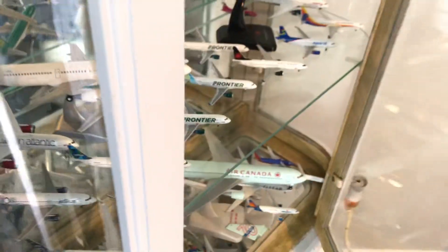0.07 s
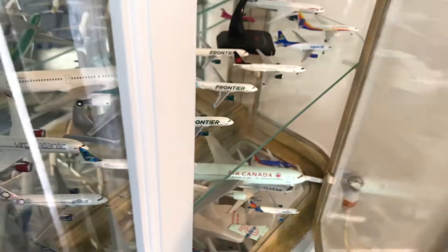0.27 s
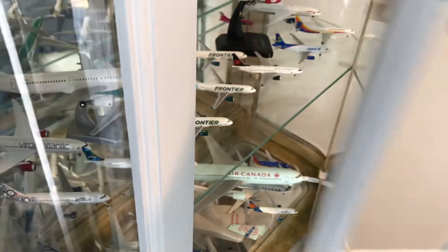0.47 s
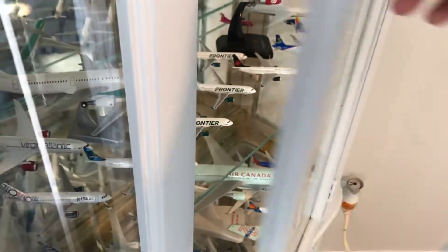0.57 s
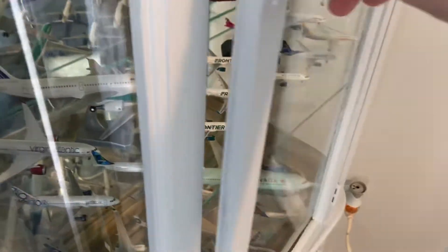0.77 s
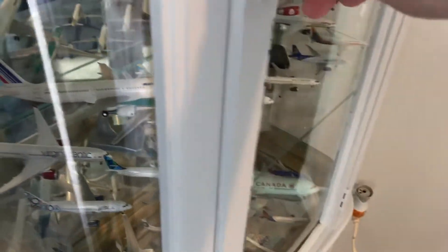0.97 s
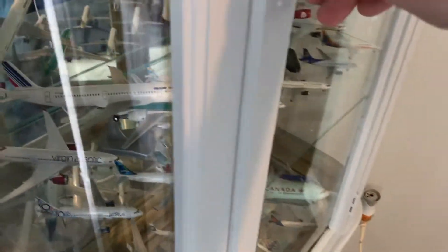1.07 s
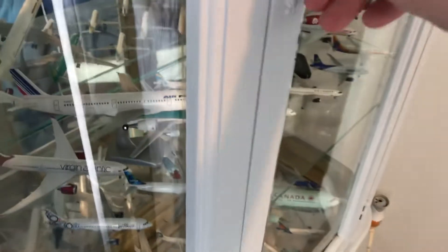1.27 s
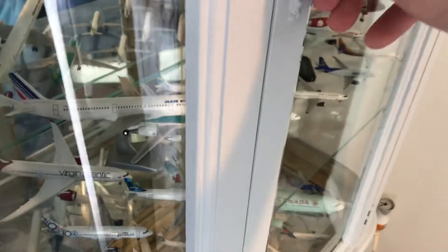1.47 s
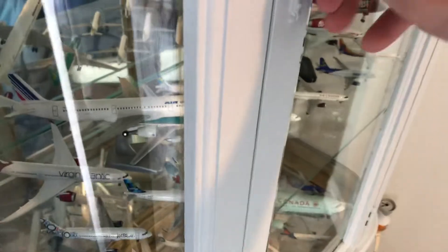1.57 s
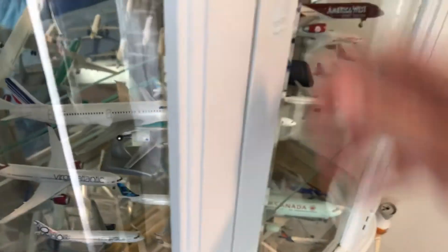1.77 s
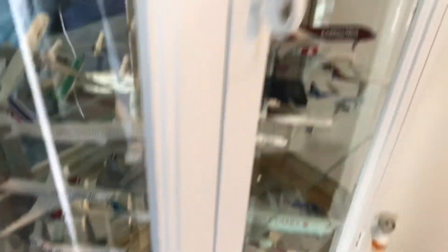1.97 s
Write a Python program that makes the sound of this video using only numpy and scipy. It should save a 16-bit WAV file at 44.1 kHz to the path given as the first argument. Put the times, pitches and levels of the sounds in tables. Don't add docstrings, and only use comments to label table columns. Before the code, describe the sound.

Close phone pickup of a sticking glazed door: quiet handling first, a soft clicking knock, then a bright catch snap and heavy thud with ringing glass, short room echo and faint finger taps afterwards.

```python
import sys
import numpy as np
from scipy import signal
from scipy.fft import rfft, irfft
from scipy.io import wavfile
from scipy.ndimage import uniform_filter1d

SR = 44100
rng = np.random.default_rng(int(sys.argv[2]) if len(sys.argv) > 2 else 0)


def magnitude_from_level(level_db):
    exponent = np.asarray(level_db, float) / 20
    return 10 ** exponent


def unload_wav(signal):
    wavfile.write(
        sys.argv[1],
        SR,
        np.round(np.clip(np.atleast_2d(signal).T, -1, 1) * 32767).astype(np.int16),
    )


N = 88332


def read(table, hz):
    table = np.array(table, float)
    return np.interp(np.log(np.maximum(hz, 1)), np.log(table[:, 0]), table[:, 1])


def unit(x):
    return x / np.sqrt(np.mean(x ** 2))


def coloured(table):
    gain = magnitude_from_level(read(table, np.fft.rfftfreq(N, 1 / SR)))
    return unit(irfft(rfft(rng.standard_normal(N)) * gain, N))


def band(x, hz, width_hz):
    top = .45 * SR
    return signal.lfilter(*signal.iirpeak(min(hz, top), hz / min(width_hz, top), SR), x)


def narrow(x, hz, width_hz):
    return unit(band(band(x, hz, width_hz), hz, width_hz))


def ring(x, modes):
    out = 0
    for hz, db, t60 in modes:
        pole = np.exp(2j * np.pi * hz / SR - np.log(1000) / (t60 * SR))
        out = out + magnitude_from_level(db) * signal.lfilter([1], [1, -pole], x).imag
    return out


def decay(s, ms):
    t = np.arange(N) / SR - s
    return np.clip(t / 0.00038, 0, 1) * np.exp(-np.maximum(t, 0) / (ms / 1000))


def hump(s, length):
    return np.sin(np.pi * np.clip((np.arange(N) / SR - s) / length, 0, 1)) ** 2


def walk(rate):
    k = int(SR / rate)
    return unit(uniform_filter1d(uniform_filter1d(rng.standard_normal(N), k), k))


def pushes(rows):
    return sum(magnitude_from_level(db) * hump(s, ms / 1000) / (ms * SR / 2000) for s, db, ms, *_ in rows)


def cracks(rows, colour):
    return coloured(colour) * sum(magnitude_from_level(db) * decay(s, ms) for s, _, _, db, ms in rows)


# [t/s, thump level/dB, push length/ms, crack level/dB, crack length/ms]
SLAM_HITS = [
    (1.2655, -27, 2, -28, 3.1),
    (1.2777, -30.5, 1.88, -5.5, 3.9),
    (1.281, -19, 0.91, -8.5, 1.8),
    (1.287, -24.5, 2.9, -9.5, 3),
    (1.2906, -19, 4, -13, 1),
    (1.2977, -24.5, 0.92, -13, 1.5),
    (1.3015, -35.5, 2.5, -20, 11),
    (1.33, -35, 2.5, -31, 51.6),
]
KNOCK_HITS = [
    (.9705, -37, 1.8, -37.5, 8.4),
    (.9752, -25.5, 1.93, -50, 1.6),
    (.9785, -44, 0.9, -20, 1.9),
    (.9812, -28, 2.28, -24.5, 7.1),
    (.99, -43, 2.2, -35, 31),
    (1.007, -32, 1.63, -45, 3.3),
]
TAP_HITS = [
    (.002, -46.5, 2.5, -45.5, 4.5),
    (1.767, -51.5, 1.6, -42.5, 4.9),
    (1.969, -55, 1.9, -80.5, 1.7),
    (1.9935, -48, 0.98, -46, 2.8),
]
# [t/s, level/dB, length/ms]
CATCH_SNAPS = [
    (1.2548, -12, 3.8),
    (1.258, -2.5, 0.62),
    (1.259, -4, 0.77),
    (1.262, -5, 3.8),
    (1.2656, -12.5, 5.9),
    (1.2695, -19.5, 3),
    (1.273, -15.5, 3.3),
]
# [f/Hz, level/dB]
SLAM_COLOUR = [(180, -62), (300, -2), (1200, -3), (2140, -3), (3190, -2), (4600, -8), (6740, -9),
               (16000, -30.5)]
KNOCK_COLOUR = [(300, -5.5), (700, -6.5), (3000, -6.5), (6800, -15), (10500, -21.5), (16000, -15.5)]
SNAP_COLOUR = [(180, -41.5), (300, -14), (593, -17), (1120, 0), (3460, 3), (3760, -0.5), (10400, -7.5),
               (15000, -5.5), (16000, -38)]
# [f/Hz, level/dB, time to fall 60 dB/s]
PANE_MODES = [(1053, -11, 0.2), (1190, -13, 0.11), (1950, -10.5, 0.1), (2615, -11, 0.03), (3000, -17, 0.1)]


def door():
    crack = cracks(SLAM_HITS, SLAM_COLOUR) + cracks(KNOCK_HITS + TAP_HITS, KNOCK_COLOUR)
    snap = coloured(SNAP_COLOUR) * sum(magnitude_from_level(db) * decay(s, ms) for s, db, ms in CATCH_SNAPS)
    pane = ring(magnitude_from_level(-20.5) * (crack + snap), PANE_MODES) / 30
    return .5 * (crack + snap) + pane


# [f/Hz, level/dB, time to fall 60 dB/s]
BODY_MODES = [(90, -12.5, 0.32), (107.9, 2, 0.33), (122.4, -2, .25), (154.8, -0.5, 0.28), (179, -4.5, 0.15),
              (200.9, -1.5, 0.16), (232, -6, 0.14), (298.5, -7.5, 0.33), (330, -5.5, 0.39),
              (383, 0.5, 0.33), (424.2, -4.5, 0.19), (673, -12.5, 0.38)]
KNOCK_MODES = [(120, 2.5, 0.12), (146, -7.5, .12), (187.8, 0, 0.14), (228, 4.5, 0.11), (323.7, -12.5, 0.49),
               (395.4, -2.5, 0.25), (660, -12.5, 0.099), (1040, -16.5, 0.17)]
# [t/s, level/dB, push length/ms]
FINGER_TAPS = [
    (1.769, -33.5, 5.26),
]
# [f/Hz, level/dB, time to fall 60 dB/s]
PANEL_MODES = [(157, 0.92, 0.35), (192, -0.75, 0.27)]
# [t/s, level/dB, push length/ms]
SWAY_PUSHES = [
    (1.31, -41, 9),
    (1.44, -44.5, 6.9),
    (1.5, -47.5, 9.3),
]
# [f/Hz, level/dB, time to fall 60 dB/s]
CABINET_MODES = [(51.8, 0.0021, 0.71)]


def wood():
    tap = pushes(FINGER_TAPS)
    finger = ring(tap, PANEL_MODES[:1]) - ring(tap, PANEL_MODES[1:])
    low_cut = signal.butter(2, 95, "high", fs=SR, output="sos")
    slam = signal.sosfilt(low_cut, ring(pushes(SLAM_HITS + TAP_HITS), BODY_MODES))
    knock = ring(pushes(KNOCK_HITS), KNOCK_MODES)
    return (slam + knock + finger) / 2 + ring(pushes(SWAY_PUSHES), CABINET_MODES)


BLOW_TIMES = [
    .981,
    1.2551,
    1.2774,
    1.2813,
    1.296,
    1.7655,
    1.841,
]
# [f/Hz, level/dB, time to fall 60 dB/s]
BLOW_MODES = [
    [(1930, -37.5, .04), (2450, -34.5, .04), (3000, -35, 0.057), (4140, -35.5, .03), (5800, -39, 0.026)],
    [(1168, -18, 0.059), (3800, -21, 0.029)],
    [(1431, -14, 0.028), (2044, -9.5, .03), (2593, -14, 0.026), (3210, -15, .03), (4410, -13.5, 0.022),
     (6860, -10.5, 0.011), (9000, -14, 0.014)],
    [(677.3, -24, 0.078), (1091, -15, 0.045)],
    [(1910, -19, .035), (3030, -24.5, 0.061)],
    [(670, -55, .05), (1122, -50, 0.035)],
    [(540, -58, 0.045)],
]


def clangs():
    out = 0
    for s, modes in zip(BLOW_TIMES, BLOW_MODES):
        blow = pushes([(s, 0, .1)])
        out = out + ring(blow, modes[1::2]) - ring(blow, modes[::2])
    return out


def scrape():
    start_s, end_s, end_db, rise_db = 1.196, 1.254, -39.5, 21
    t = np.arange(N) / SR
    grain = rng.standard_normal(N) * magnitude_from_level(3.9 * walk(270))
    pressure = magnitude_from_level(end_db + rise_db * (t - end_s).clip(-1, 0) / (end_s - start_s))
    pressure = pressure * (t > start_s) * (t < end_s)
    low = unit(band(band(grain, 1410, 460), 1410, 750))
    high = magnitude_from_level(-2) * unit(band(grain, 2050, 400))
    hiss = magnitude_from_level(-6) * unit(band(grain, 2700, 6000))
    return pressure * (low + high + hiss)


# [f/Hz, width/Hz, level/dB]
HINGE_MODES = [(2800, 110, -15.5), (3210, 96, -6.5), (3800, 240, -7.5), (4630, 180, -10.5),
               (5570, 160, -11), (6600, 110, -12)]
# [t/s, level/dB]
HINGE_PRESSURE = [(.07, -105), (.095, -64), (.28, -66), (.31, -65), (.45, -66.5), (.6, -85), (.8, -66),
                  (.92, -93)]


def hinge():
    free_s, fade_db_per_s = .27, 127
    t = np.arange(N) / SR
    load = np.interp(t, *np.array(HINGE_PRESSURE).T, left=-120, right=-120)
    out = 0
    for hz, width_hz, db in HINGE_MODES:
        fade = fade_db_per_s * (t - free_s).clip(0) * (hz > 3500)
        level = magnitude_from_level(load + db + 2.2 * walk(25) - fade)
        out = out + level * unit(band(rng.standard_normal(N), hz, width_hz))
    return out


# [t/s, level/dB, f/Hz, width/Hz, length/ms]
TICK_EVENTS = [(0.027, -57, 3300, 2500, 2.3), (0.26, -59, 3220, 520, 7.9), (.979, -32, 11250, 810, 1.7),
               (1.017, -50.5, 5700, 700, 4.1), (1.1125, -45, 3930, 2000, 4.6),
               (1.1115, -43.5, 7800, 4800, 0.7), (1.152, -56, 1700, 1200, 9), (1.4, -45, 1400, 450, 6.2),
               (1.1801, -44.5, 11000, 9600, 4.5), (1.2609, -3.5, 15000, 2000, 0.66),
               (1.2575, -11.5, 18000, 3000, 0.57), (2, -53.5, 3800, 1400, 22),
               (1.613, -47.5, 3650, 2300, 1.1), (1.728, -53, 4800, 5000, 2.6), (3.3, -66, 4660, 4940, 1.3),
               (1.9401, -43, 8800, 790, 1.4), (1.9399, -52.5, 4500, 1600, 1.44),
               (1.9395, -50.5, 12000, 3000, 2.8), (1.971, -50.5, 2240, 420, 1.8),
               (2.5, -52, 2370, 410, 2.3)]


def ticks():
    noise = rng.standard_normal(N)
    return sum(magnitude_from_level(db) * decay(s, ms) * narrow(noise, hz, width) for s, db, hz, width, ms in TICK_EVENTS)


# [t/s, length/s, level/dB, f/Hz]
RUSTLE_EVENTS = [(0.087, 0.083, -63.5, 1370), (1.769, 0.048, -62.5, 4160), (0.094, 0.012, -58.5, 9000),
                 (0.139, 0.06, -63.5, 5900), (0.217, 0.077, -63.5, 5900), (0.328, 0.08, -68, 9000),
                 (0.418, 0.043, -68.5, 12000), (0.694, 0.036, -72, 13000), (0.612, 0.0082, -57, 2780),
                 (0.67, .02, -66, 9000), (1.136, 0.1, -60, 1300), (1.42, 0.273, -62, 4985),
                 (1.726, 0.085, -62, 5000), (1.82, 0.17, -69.5, 4160)]
# [t/s, length/s, level/dB, f/Hz]
NARROW_RUBS = [
    (0.093, 0.0079, -58, 4350),
    (0.68, 0.017, -70, 5800),
    (0.606, 0.026, -62, 790),
    (1.18, 0.088, -57, 300),
    (1.533, 0.052, -60.5, 1320),
    (1.769, 0.042, -63.5, 820),
    (1.844, 0.017, -66, 515),
    (1.993, .02, -60.5, 566),
]


def rustle():
    edge_s = 0.053
    t = np.arange(N) / SR
    grain = rng.standard_normal(N) * magnitude_from_level(2.5 * walk(200))

    def gate(s, length):
        return np.clip(np.minimum(t - s, s + length - t) / edge_s + .5, 0, 1)

    out = 0
    for s, length, db, hz in RUSTLE_EVENTS:
        out = out + magnitude_from_level(db) * gate(s, length) * unit(band(grain, hz, 2.5 * hz))
    for s, length, db, hz in NARROW_RUBS:
        out = out + magnitude_from_level(db) * gate(s, length) * narrow(grain, hz, 0.54 * hz)
    return out


# [f/Hz, time to fall 60 dB/s]
ROOM_DECAY = [(60, 0.83), (250, 0.43), (1000, 0.22), (4000, 0.16), (10000, 0.24), (16000, 0.12)]


def room(x):
    gap_ms = 2.5
    t = np.arange(SR // 2) / SR
    tail = 0
    for hz in 45 * 2 ** np.arange(0, 8.6, .5):
        noise = band(rng.standard_normal(len(t)), hz, hz / 2.8)
        tail = tail + noise * magnitude_from_level(-60 * t / read(ROOM_DECAY, hz))
    tail = tail * np.clip(t * 1000 / gap_ms - 1, 0, 1)
    return magnitude_from_level(-7.5) * signal.fftconvolve(x, tail / np.sqrt(np.sum(tail ** 2)))[:N]


def lens():
    first_s, period_s, hz = .0275, .1025, 14200
    times = first_s + period_s * np.arange(int(N / SR / period_s) + 1)
    beats = sum(decay(s, 1.5) for s in times)
    return magnitude_from_level(-69) * beats * narrow(rng.standard_normal(N), hz, 4000)


# [f/Hz, level/dB]
AIR_COLOUR = [(25, -3.5), (50, 6.5), (120, -7.5), (300, -18), (700, -17.5), (3000, -26), (10000, -37.5),
              (16000, -34.5)]
# [f/Hz, width/Hz, level/dB]
DRONE_BANDS = [(63, 24, -70), (235.7, 33, -70.5), (353.3, 3.2, -72.5)]


def air():
    hush = magnitude_from_level(-60.5 + 0.4 * walk(1.3)) * coloured(AIR_COLOUR)
    drone = 0
    for hz, width_hz, db in DRONE_BANDS:
        drone = drone + magnitude_from_level(db + 1.23 * walk(1.2)) * unit(band(rng.standard_normal(N), hz, width_hz))
    return hush + drone


def scene():
    loud = door() + scrape() + clangs()
    body = wood()
    small = ticks() + rustle() + hinge()
    tail = room(loud + magnitude_from_level(-9.5) * body + magnitude_from_level(-6) * small)
    return (loud + body + small + tail + air() + lens())[None]


def top_cut(x):
    return signal.sosfilt(signal.butter(12, 16680, fs=SR, output="sos"), x)


# [f/Hz, level/dB]
MIC_COLOUR = [(300, 3.5), (8000, 0), (10600, -1.5), (14500, 2), (15500, -0.5), (16500, -3)]


def record(dry):
    peak_limit, knee = .88, 6
    gain = magnitude_from_level(read(MIC_COLOUR, np.fft.rfftfreq(2 * N, 1 / SR)))
    x = irfft(rfft(dry, 2 * N) * gain, 2 * N)[:, :N]
    x = signal.sosfilt(signal.butter(3, 45.7, "high", fs=SR, output="sos"), x)
    x = x / (1 + np.abs(x / peak_limit) ** knee) ** (1 / knee)
    x = signal.sosfilt(signal.ellip(9, .3, 45, 15950, fs=SR, output="sos"), x)
    return top_cut(x)


dry = scene()
out = record(dry)
unload_wav(out)
```